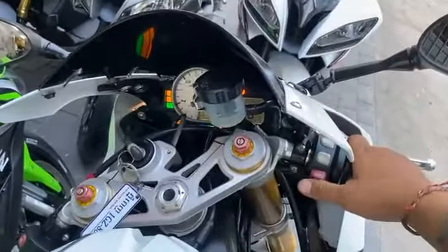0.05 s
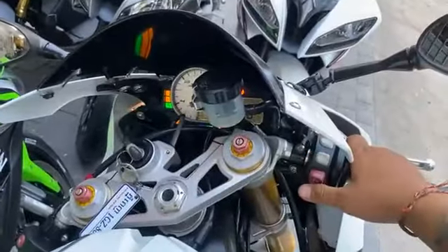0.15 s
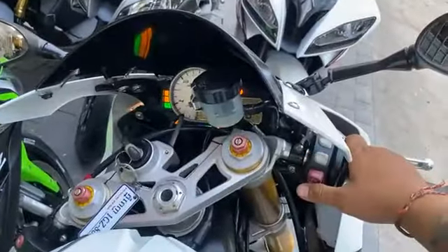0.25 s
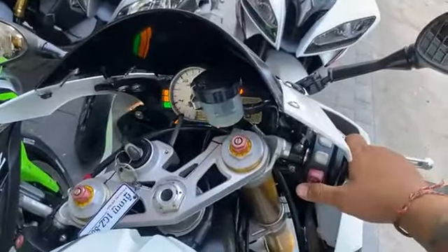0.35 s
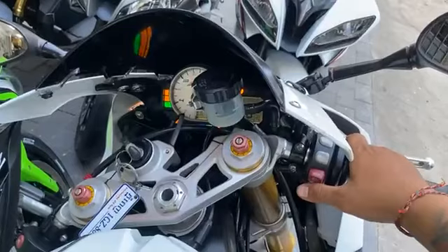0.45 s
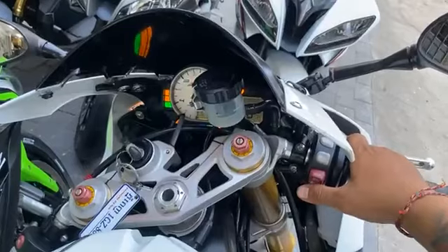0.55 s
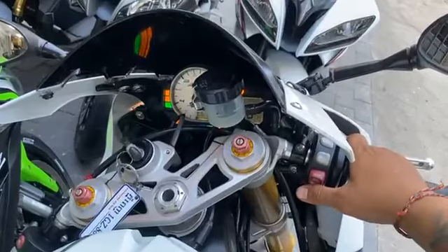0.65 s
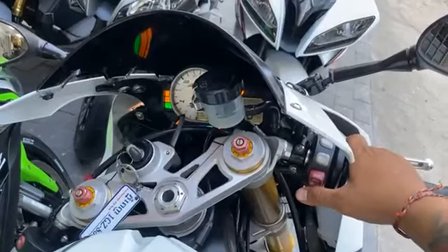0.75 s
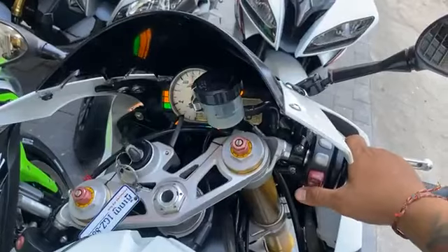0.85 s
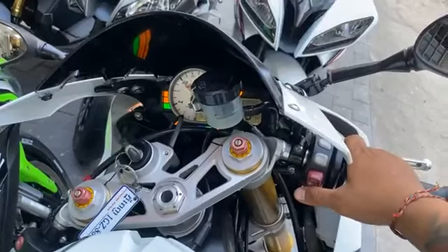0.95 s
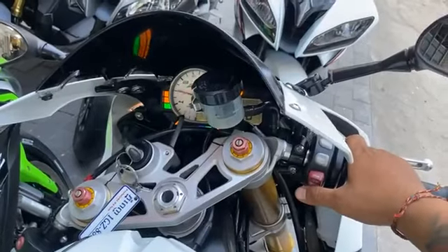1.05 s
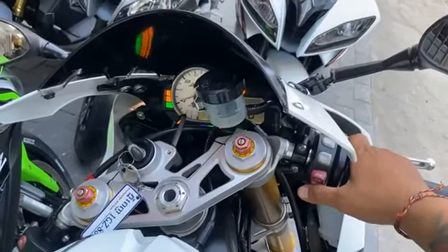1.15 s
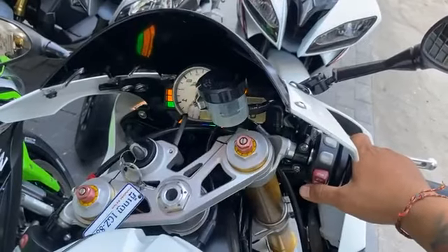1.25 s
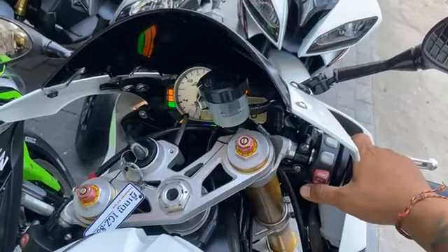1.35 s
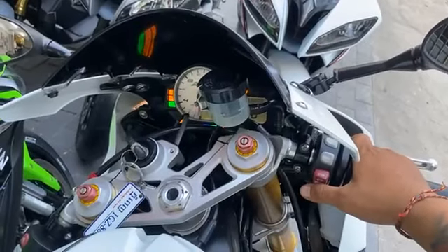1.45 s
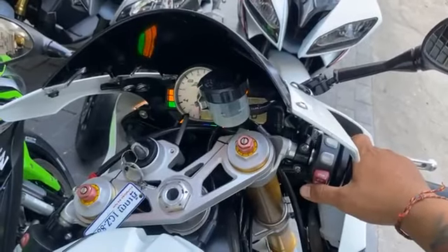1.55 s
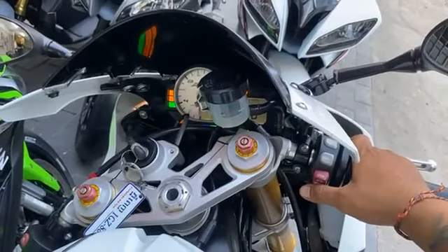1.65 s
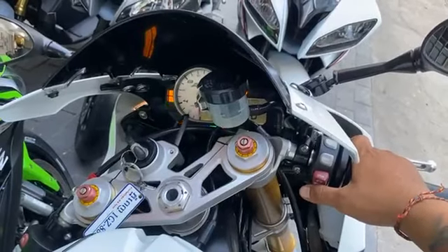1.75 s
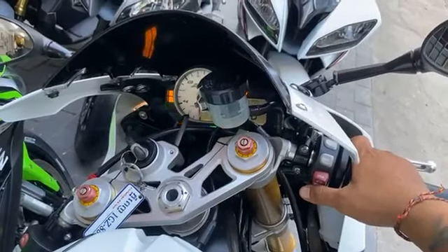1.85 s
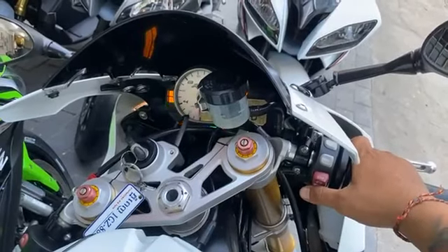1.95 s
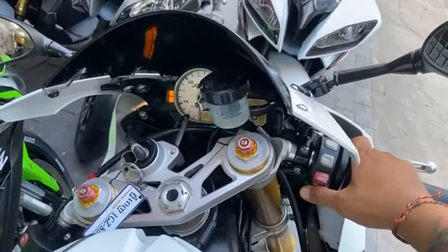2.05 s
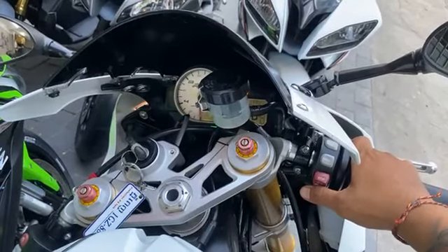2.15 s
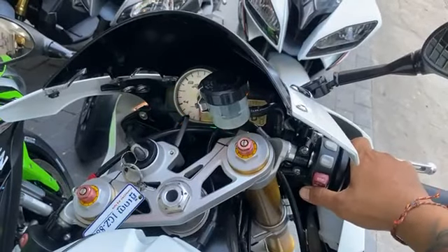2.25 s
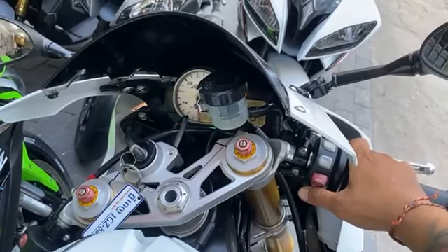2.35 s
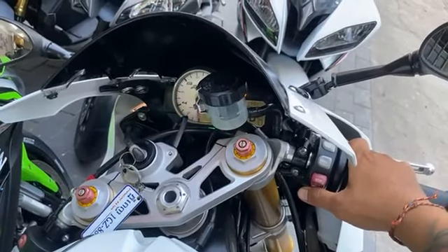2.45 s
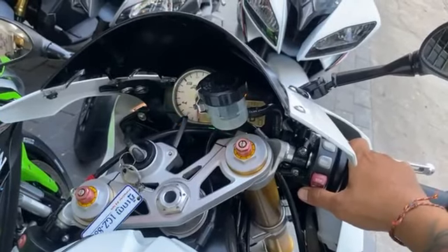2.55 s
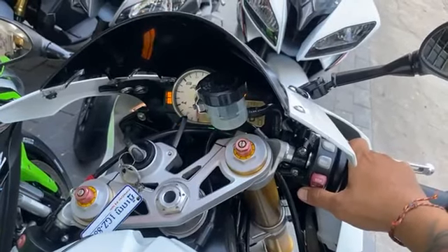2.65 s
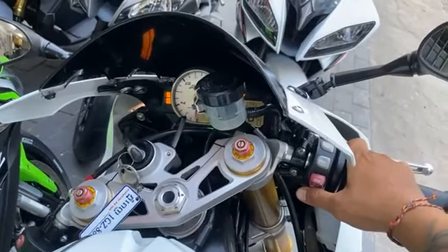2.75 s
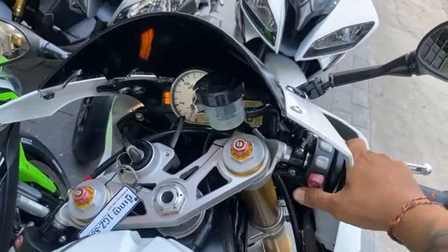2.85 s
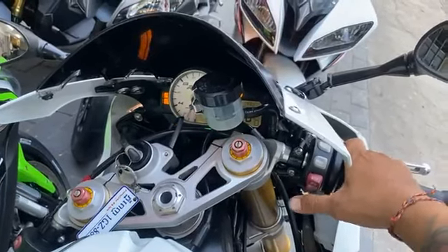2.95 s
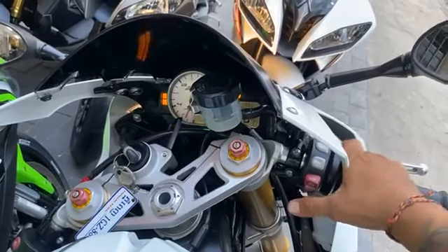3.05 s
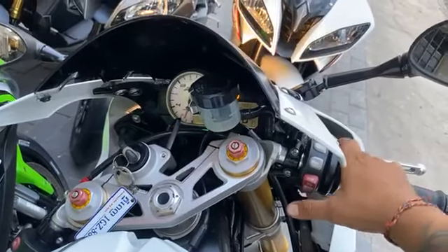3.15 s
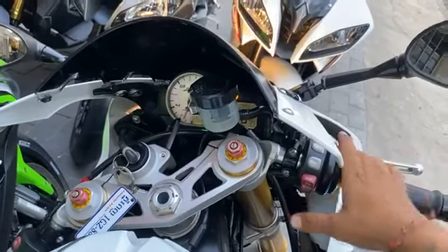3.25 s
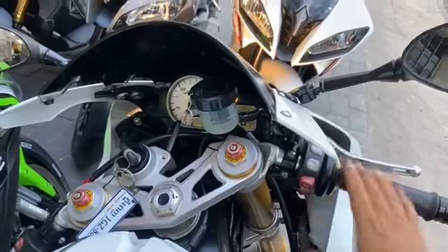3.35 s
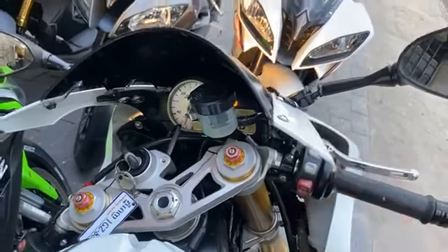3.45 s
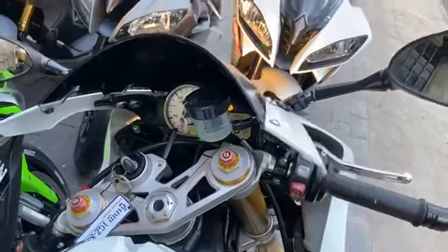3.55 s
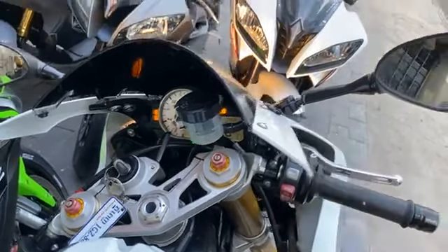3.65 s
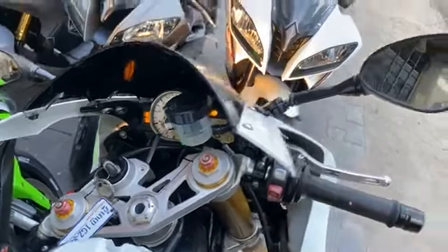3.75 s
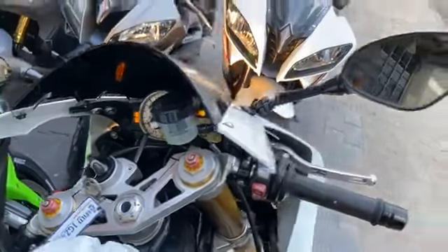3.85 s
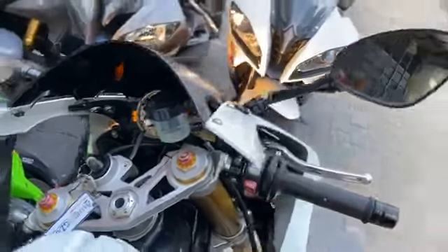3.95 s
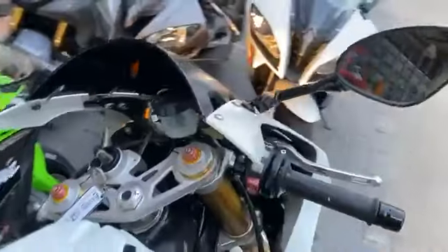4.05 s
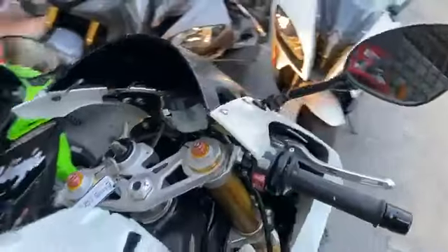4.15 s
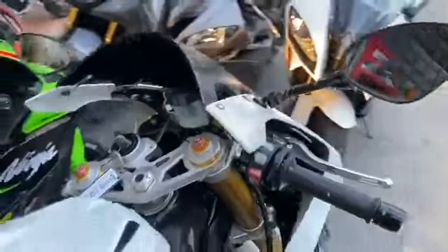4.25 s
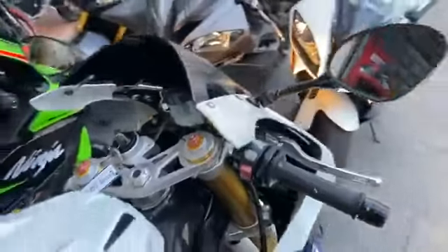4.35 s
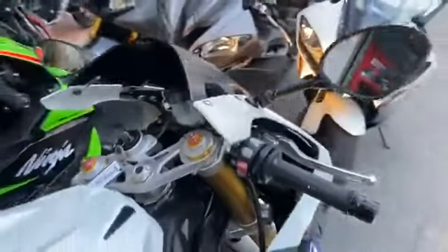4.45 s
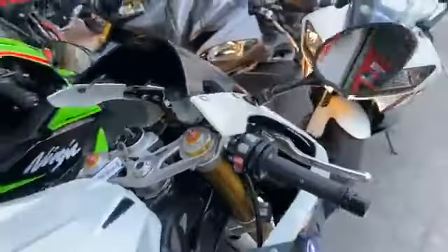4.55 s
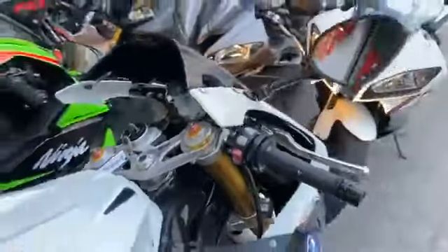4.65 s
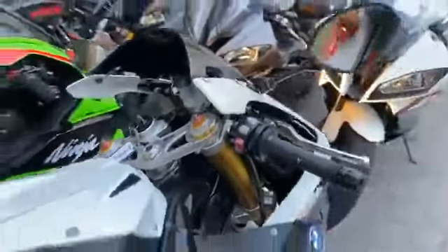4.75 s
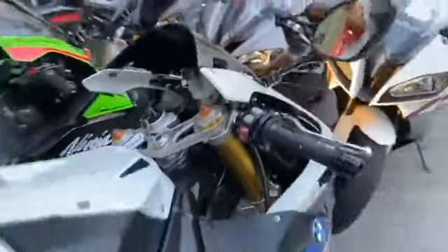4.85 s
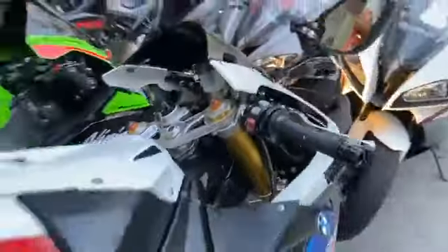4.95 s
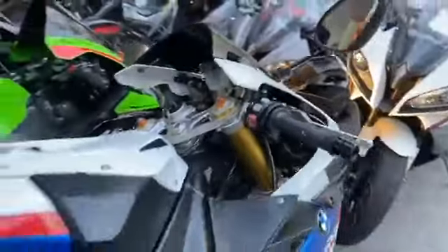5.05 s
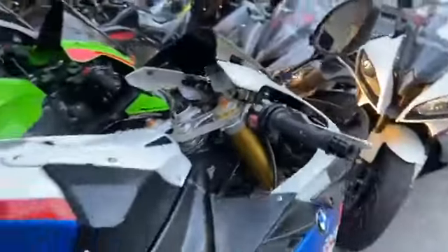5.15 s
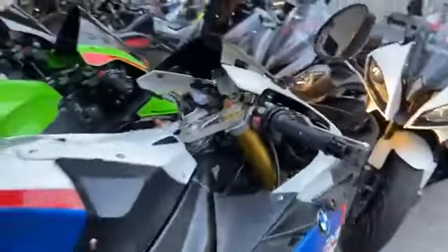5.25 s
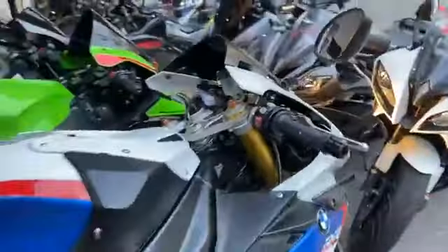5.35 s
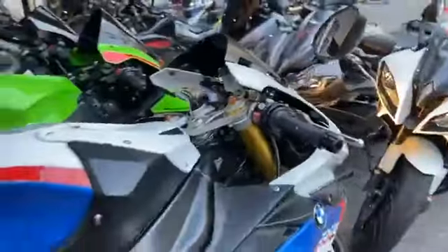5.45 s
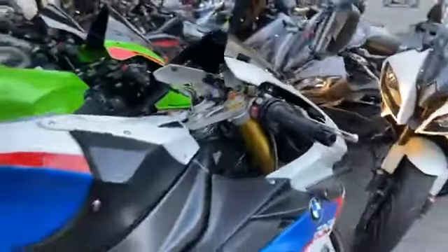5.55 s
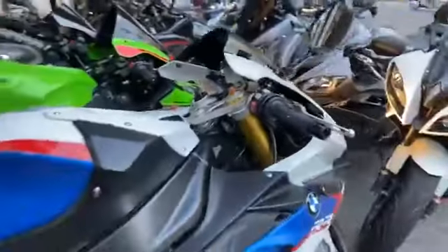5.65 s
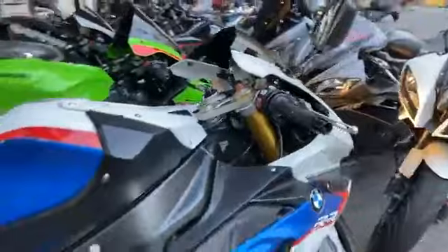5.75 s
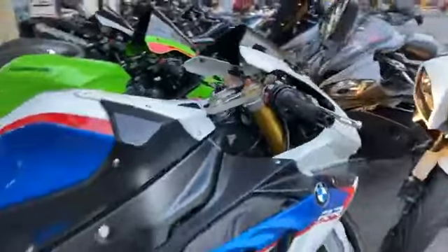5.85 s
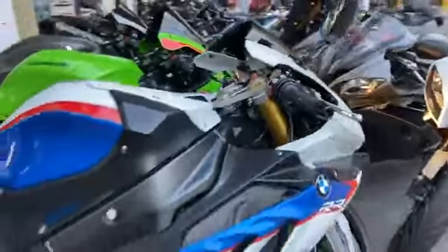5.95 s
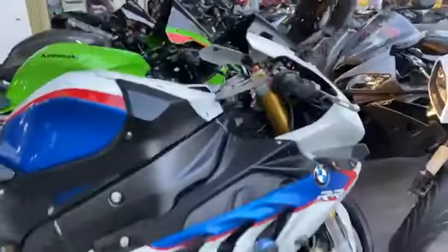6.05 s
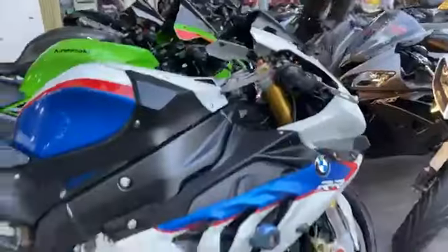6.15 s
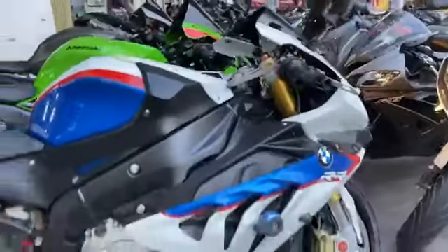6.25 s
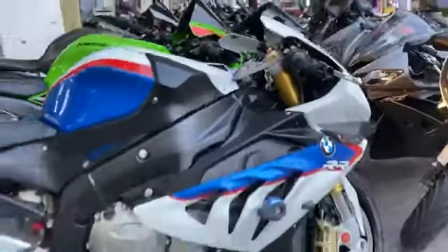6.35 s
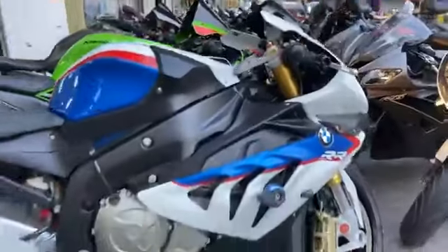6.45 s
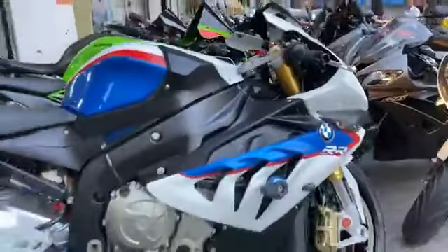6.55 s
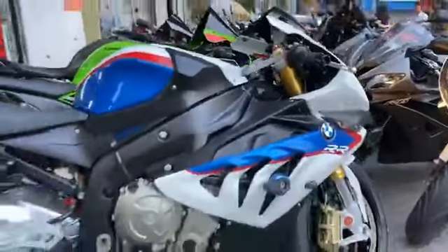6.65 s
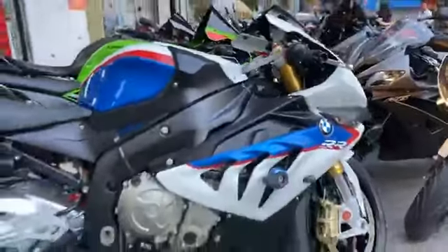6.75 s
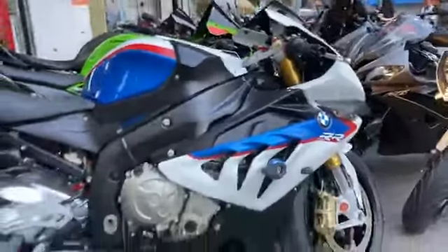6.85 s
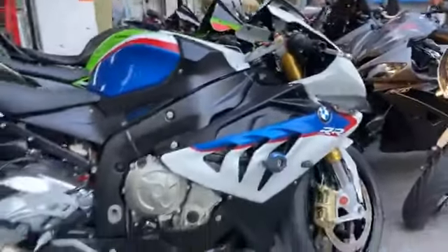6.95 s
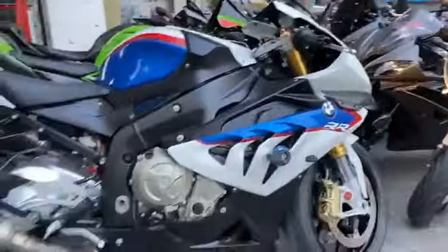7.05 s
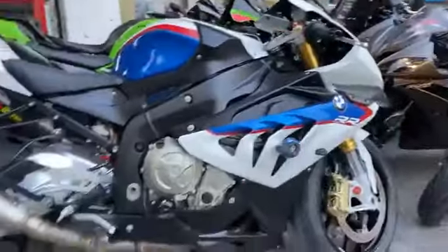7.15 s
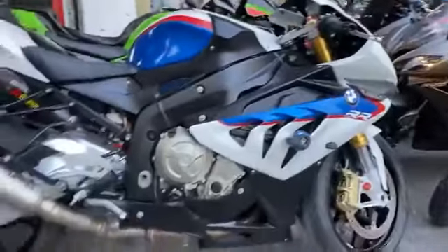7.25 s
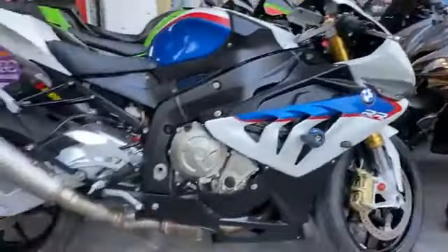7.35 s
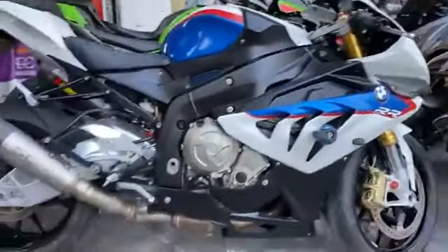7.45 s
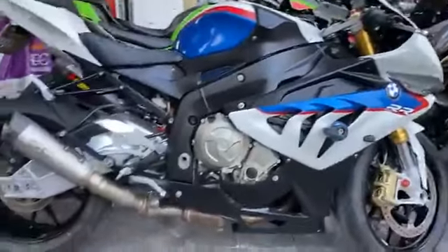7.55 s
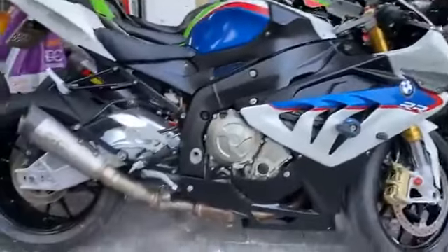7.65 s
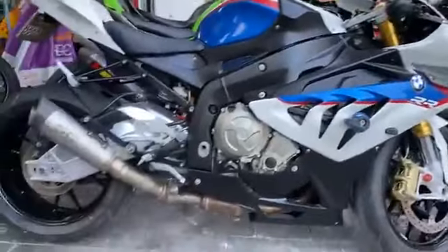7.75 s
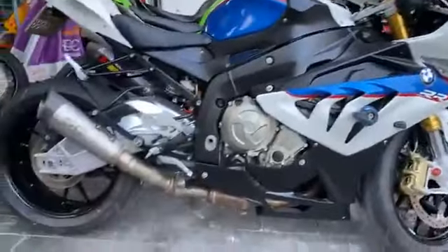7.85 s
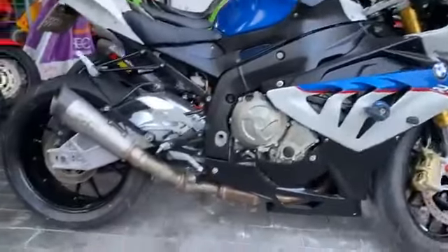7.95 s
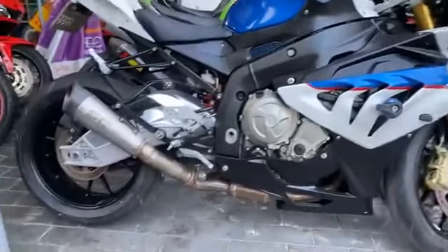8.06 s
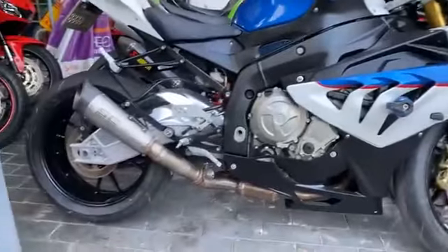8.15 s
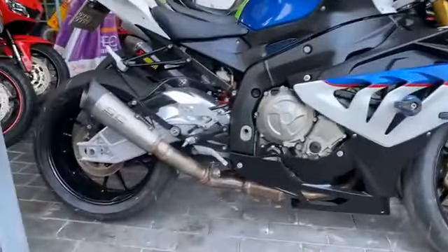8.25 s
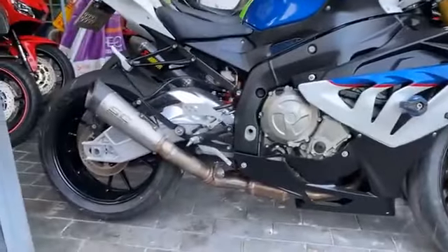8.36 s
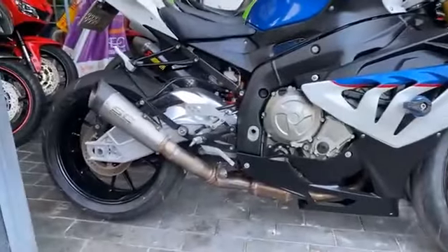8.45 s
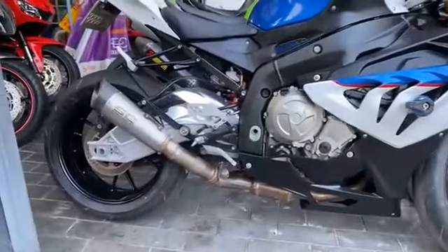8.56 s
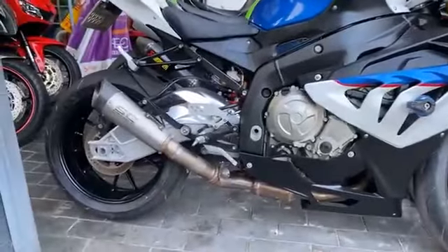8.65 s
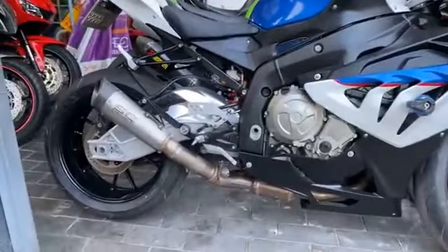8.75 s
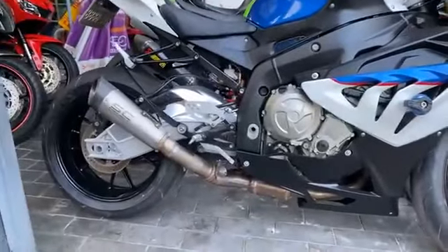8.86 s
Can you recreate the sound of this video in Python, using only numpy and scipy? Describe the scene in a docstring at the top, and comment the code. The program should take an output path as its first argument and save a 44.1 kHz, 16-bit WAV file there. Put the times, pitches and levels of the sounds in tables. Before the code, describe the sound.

After two seconds of quiet street rumble, a starter grinds through five compressions and a four-cylinder motorcycle catches, idling with a lumpy, fast-surging exhaust throb.

```python
"""Sport motorcycle starting and idling

A four-cylinder motorcycle is started among parked bikes, with traffic rumbling beyond: filtered noise.
The starter grinds through five compressions: toothed noise and sagging tones. Then the engine catches.
It idles with a lumpy surge about five times a second; each firing is a pulse that rings a short open pipe.
Valve gear rattles as noise shaped by small ticks, and faint whines come and go.
The sound colours change as the listener walks from the cockpit to the bike's side."""
import sys
import numpy as np
from scipy import signal
from scipy.fft import rfft, irfft, next_fast_len
from scipy.io import wavfile

SR = 44100
rng = np.random.default_rng(int(sys.argv[2]) if len(sys.argv) > 2 else 0)


def to_wav(sig):
    """Store sig (one row per channel, or 1-D mono) as 16-bit WAV at the path in sys.argv[1].

    Samples outside -1..1 are clipped; the rate is SR.
    """
    pcm = np.clip(np.atleast_2d(sig), -1, 1) * 32767
    pcm = np.round(pcm).astype(np.int16)
    wavfile.write(sys.argv[1], SR, pcm.T)  # frames by channels


N = 392931
TIME = np.arange(N) / SR   # s
SOLENOID_S, CATCH_S = 2.176, 2.745   # when the starter is thrown in, and when the engine catches
CLATTER_SWING_DB = 2   # how far gear load moves clatter and whines in the deepest surges

# The idle hunts: each surge has one hardest boom, then the cylinders fire weakly for a moment
# [boom t/s, boom strength/0-1, strength in the lull after it/0-1, lull length/s]
SURGES = [(2.763, 0.67, .8, .03), (2.792, 0.69, 0.15, 0.093), (3.012, .52, 0.49, 0.028),
          (3.203, 0.67, 0.19, 0.064), (3.370, 0.58, 0.41, 0.027), (3.621, 0.55, 0.23, 0.082),
          (3.793, 0.58, 0.14, 0.1), (3.961, 0.52, 0.21, 0.1), (4.132, 0.59, 0.19, 0.1),
          (4.322, 0.55, 0.1, 0.064), (4.511, 0.49, 0.29, 0.12), (4.682, 0.61, .16, 0.064),
          (4.853, 0.66, 0.33, 0.053), (5.047, 0.71, 0.58, 0.051), (5.234, 0.77, 0.17, 0.122),
          (5.408, 0.81, 0.19, 0.11), (5.578, 0.77, .12, 0.094), (5.768, 0.68, 0.14, 0.096),
          (5.960, 0.72, 0, 0.042), (6.131, 0.68, 0.49, 0.12), (6.345, 0.75, 0.12, 0.093),
          (6.541, 0.73, 0.02, 0.041), (6.734, 0.67, 0.04, 0.066), (6.929, 0.7, 0.43, 0.064),
          (7.120, 0.73, 0.39, 0.05), (7.311, 0.65, 0.12, 0.058), (7.505, 0.68, 0.39, 0.035),
          (7.699, 0.71, 0.31, 0.032), (7.89, .76, .02, 0.069), (8.064, 0.75, 0.27, .075),
          (8.254, 0.71, 0.46, 0.056), (8.448, 0.69, 0.54, 0.025), (8.641, 0.75, 0.46, 0.029),
          (8.832, 0.76, 0.09, 0.06)]
# What reaches the listener from the pipe
# [t/s, change in drone of the two lowest resonances/dB, change in bark/dB, change in rasp/dB]
FACING = [(2.8, 5, 6, 11), (3.4, 0, 4.5, 2), (3.75, 4, 6.5, 11.5), (4.0, 4, 7, 8), (4.6, 2.5, 2.5, 13.5),
          (5.2, -1.5, 2.5, -7), (6.0, 0.5, 3, -17), (7.0, -1, 2, -8), (8.0, -1.5, -1.5, -9),
          (8.9, -1.5, -7.5, -0.5)]
# Colour of the gas rushing out of the pipe [f/Hz, level per Hz/dB]
RUSH = [(150, 9.5), (250, 4.5), (330, 4), (430, -2.5), (550, 1.5), (640, -14.5), (710, -57), (800, -11),
        (1100, -32), (2500, -25)]


def from_db(db):
    """Decibels to gain."""
    return 10 ** (np.asarray(db) / 20)


def rms_one(x):
    """Scale to unit power."""
    return x / np.sqrt(np.mean(x ** 2) + 1e-20)


def in_time(rows):
    """Each column of a curve at every sample."""
    s, *columns = np.transpose(rows)
    return [np.interp(TIME, s, c) for c in columns]


def coloured(x, spectrum):
    """Give x a spectrum that falls away steeply past both ends; rms 1."""
    hz, db = np.transpose(spectrum)
    size = next_fast_len(N)
    octave = np.log2(np.maximum(np.arange(size // 2 + 1) * SR / size, 1))
    below = np.maximum(np.log2(hz[0]) - octave, 0)
    above = np.maximum(octave - np.log2(hz[-1]), 0)
    gain = from_db(np.interp(octave, np.log2(hz), db) - 105 * (below + above))
    return rms_one(irfft(rfft(x, size) * gain, size)[:N])


def cut(x, hz, kind, order=2):
    """Butterworth low-pass or high-pass."""
    sos = signal.butter(order, min(hz, .45 * SR), kind, fs=SR, output="sos")
    return signal.sosfilt(sos, x + 1e-18)


def resonate(x, hz, width_hz):
    """One resonance with gain 1 on top."""
    r = np.exp(-np.pi * width_hz / SR)
    top = np.array([1, 0, -1]) * (1 - r * r) / 2
    return signal.lfilter(top, [1, -2 * r * np.cos(2 * np.pi * hz / SR), r * r], x + 1e-18)


def body(x, modes):
    """Resonances in parallel, with alternating signs."""
    return sum((-1) ** k * from_db(db) * resonate(x, hz, width) for k, (hz, width, db) in enumerate(modes))


def clicks(at, sizes):
    """Single impulses at the given samples."""
    return np.bincount(np.clip(at, 0, N - 1).astype(int), sizes, N)


def linger(x, decay_s):
    """Every impulse becomes an exponential fade of the same height."""
    return signal.lfilter([1], [1, -np.exp(-1 / (decay_s * SR))], x + 1e-18)


def swell(start, rise_s, decay_s):
    """A straight rise to 1, then an exponential fade."""
    age = TIME - start
    return np.clip(age / rise_s, 0, 1) * np.exp(-np.maximum(age - rise_s, 0) / decay_s)


def noise():
    """White noise."""
    return rng.standard_normal(N)


def narrow(hz, width_hz):
    """A wavering tone: noise twice through one resonance; rms 1."""
    return rms_one(resonate(resonate(noise(), hz, width_hz), hz, width_hz))


def sine(hz):
    """A sine whose frequency may change from sample to sample."""
    return np.sin(2 * np.pi * np.cumsum(hz) / SR)


def street(traffic_db=4, hiss_db=-50):
    """Traffic rumble and a far hiss are coloured noise; small knocks and squeaks are bands of noise."""
    # rumble over time [t/s, level before traffic_db is added/dB]
    rumble_curve = [(0.0, -33.5), (0.32, -34), (0.37, -35.5), (0.47, -32.5), (0.55, -36), (0.93, -34.5),
                    (0.99, -38), (1.53, -35.5), (2.13, -37), (2.15, -37)]
    # colours of the rumble and of the steady hiss [f/Hz, level per Hz/dB]
    rumble_colour = [(18, -62), (30, -28), (55, -14), (75, 1.5), (89, -7.5), (108, -7.5), (146, -10.5),
                     (171, -19), (286, -25.5), (346, -32), (455, -30.5), (491, -29.5), (600, -26.5),
                     (780, -52), (1320, -120)]
    hiss_colour = [(380, -30), (650, -5), (955, -1), (1050, -7), (1280, -3.5), (1380, -3), (2030, -10.5),
                   (2260, -17), (2950, -11), (4700, -17.5), (6370, -14), (7670, -20.5), (9610, -20),
                   (13800, -34), (15500, -36)]
    # small noises in the shop [t/s, level/dB, f/Hz, width/Hz, rise/s, decay/s]
    knocks = [(.29, -40, 400, 160, 0.021, 0.017), (.595, -49, 6460, 7000, 0.0031, 0.014),
              (.85, -43, 700, 800, 0.0088, .025), (1.04, -54, 4900, 80, 0.025, .06),
              (1.05, -63, 9750, 200, 0.027, .05), (1.12, -56, 4820, 80, .02, .03),
              (1.45, -41.5, 420, 400, .02, 0.03)]
    rumble_db, = in_time(rumble_curve)
    out = from_db(rumble_db + traffic_db) * coloured(noise(), rumble_colour)
    out = out + from_db(hiss_db) * coloured(noise(), hiss_colour)
    for s, db, hz, width_hz, rise, decay in knocks:
        out = out + from_db(db) * swell(s, rise, decay) * narrow(hz, width_hz)
    return out


def starter(spin_db=-42, solenoid_db=-40, teeth_db=2, grind_db=0.5, whine_hz=1950, whine_db=-4,
            whine_sag_s=.1, whine_late_s=0.024, whine_decay_s=0.013, growl_db=-3.0, overtone_db=-5,
            flutter=0.0094):
    """The motor spins up; each compression makes the gears growl and grind, and drags their whine down."""
    # compressions that load the starter [t/s, push level/dB, rise/s, decay/s, growl f/Hz]
    strokes = [(2.236, -26, 0.056, 0.032, 1010), (2.402, -24.5, 0.011, 0.018, 1130),
               (2.492, -23.5, 0.0067, 0.02, 1140), (2.584, -24, 0.0062, 0.022, 1130),
               (2.671, -25, 0.0098, 0.026, 1140)]
    # colour of the grinding [f/Hz, level per Hz/dB]
    grind_colour = [(350, -9), (600, -10), (766, -12.5), (1010, -0.5), (1340, -4), (1860, 0), (2610, -10),
                    (3110, -6.5), (4200, -10), (4880, -15), (5980, -8.5), (7540, -18.5), (9240, -15.5),
                    (13000, -30.5), (15500, -44)]
    engaged = swell(SOLENOID_S, 0.0012, np.inf)
    running = engaged * np.clip((CATCH_S + 0.017 - TIME) / 0.014, 0, 1)
    load = from_db(solenoid_db) * swell(SOLENOID_S, 0.0016, 0.3)
    waver = 1 + flutter * rms_one(cut(noise(), 130, "low"))
    spin_up_hz = np.interp(TIME, [SOLENOID_S, strokes[0][0]], [1130, 1760])
    tones = from_db(-25.5) * swell(2.205, 0.02, 0.0081) * sine(spin_up_hz * waver)
    for s, db, rise, decay, growl_hz in strokes:
        push = from_db(db) * swell(s, rise, decay)
        load = load + push
        # four harmonics, each weaker than the one below
        growl = sum(from_db(growl_db + overtone_db * k) * sine((k + 1) * growl_hz * waver) for k in range(4))
        tones = tones + push * growl
        sagging_hz = whine_hz * np.exp(-np.maximum(TIME - s - 1.4 * rise, 0) / whine_sag_s)
        whine_level = from_db(db + whine_db) * swell(s, rise + whine_late_s, whine_decay_s)
        tones = tones + whine_level * sine(sagging_hz * waver)
    roughness = np.tanh(rms_one(cut(noise(), 560, "low")))
    teeth = rms_one(from_db(teeth_db * roughness))
    grind = from_db(grind_db) * coloured(noise() * teeth, grind_colour) * np.hypot(load, from_db(spin_db))
    return (grind + tones * np.sqrt(teeth)) * running


def surge_depth(top, lull):
    """How far a surge swings the engine: 1 if firing stops in the lull, 0 if it carries on unchanged."""
    return np.sqrt(np.clip(1 - lull / top, 0, 1))


def firings(idle_firings_per_s=47.2, valve_lead_s=.0105, speed_swing=0.1393, speed_lag=0.0458,
            fade_s=0.006, pick_up_strength=0.33, pick_up_s=.035, full_at=0.81):
    """One firing per half turn of the crank, which slows in each lull and races into the next boom.

    Gives the samples at which an exhaust valve opens, and how hard each cylinder has fired.
    speed_swing is the crank's share of speed change in the deepest surges.
    speed_lag (top speed) and full_at (full strength) are shares of a surge after its boom."""
    last = SURGES[-1]
    following = SURGES[1:] + [(last[0] + last[0] - SURGES[-2][0], *last[1:])]
    times, strengths = [], []
    for (s, top, lull, lull_s), (next_s, next_top, _, _) in zip(SURGES, following):
        length = next_s - s
        count = max(round(length * idle_firings_per_s), 1)
        phase = (np.arange(count) + .5) / count - speed_lag
        speed = 1 + speed_swing * surge_depth(top, lull) * np.cos(2 * np.pi * phase)
        age = length * (np.cumsum(1 / speed) - 1 / speed) / np.sum(1 / speed)
        # fade into the lull, then pick up at a middling strength and climb to full
        weak = lull + (top - lull) * np.exp(-age / fade_s)
        climb = np.clip((age - lull_s) / max(full_at * length - lull_s, 1e-3), 0, 1)
        strong = (1 - climb) * max(pick_up_strength, lull) + climb * next_top
        picked_up = np.clip((age - lull_s) / pick_up_s + .5, 0, 1)
        # the valve opens a little before its boom peaks
        times.extend(s - valve_lead_s + age)
        strengths.extend((1 - picked_up) * weak + picked_up * strong)
    at = np.array(times) * SR
    return at[at < N].astype(int), np.array(strengths)[at < N]


def pipe_boom(at, strength, drone_db, opening_hz, scatter_db=0.7):
    """Each firing kicks the low resonances of the exhaust pipe."""
    # resonances; soft firings hardly wake the top one
    # [f/Hz, width/Hz, level at full strength before drone changes/dB, power of strength]
    pipe = [(50.5, 13.6, 40, 1.2), (100.6, 24.5, 38.5, 1.04), (159.8, 17.9, 45.5, 1.016),
            (246.8, 17.4, 44.5, 1.49)]
    boom = 0
    for k, (hz, width, db, power) in enumerate(pipe):
        sizes = strength ** power * from_db(scatter_db * rng.standard_normal(len(at)))
        # the valve takes a moment to open, which rounds every pulse
        kicks = cut(clicks(at, sizes), opening_hz, "low", order=4)
        drone_share = .5 * (k == 0) + (k == 1)
        boom = boom + (-1) ** k * from_db(db + drone_db * drone_share) * resonate(kicks, hz, width)
    return boom


def pipe_bark(at, strength, puffs, bark_db, rasp_db, opening_hz, hardness=3.5, tear_db=-50.5):
    """Hard firings wake higher pipe resonances, and the hardest puffs tear at its mouth."""
    # first three bark, the rest rasp [f/Hz, width/Hz, level before bark or rasp changes/dB]
    bark_modes = [(276, 60, 25.5), (420, 43, 1), (513, 6, 26), (660, 11, -30), (794, 65, -8.5),
                  (787, 40, 11.5)]
    sharp = cut(clicks(at, strength ** hardness), opening_hz, "low", order=4)
    bark = from_db(bark_db) * body(sharp, bark_modes[:3])
    rasp = from_db(rasp_db) * body(sharp, bark_modes[3:])
    tear_colour = [(560, -2), (630, 13.5), (710, -1), (800, 7.5), (950, -27.0)]   # f/Hz, level per Hz/dB
    tear = from_db(tear_db + rasp_db) * coloured(noise() * puffs ** 2, tear_colour)
    return bark + rasp + tear


def piston_hum(at, strength, pumping=0.13, lag_s=0.01168, hum_db=43, hum_hz=172, width_hz=18):
    """Fired or not, the rising piston then pushes the gas out and keeps the pipe humming."""
    soft = cut(clicks(at + lag_s * SR, pumping * (1 + strength)), 440, "low")
    return from_db(hum_db) * resonate(soft, hum_hz, width_hz)


def gas_rush(at, strength, puffs, bark_db, rush_db=-39, turbulence_db=1):
    """Gas leaves as one clean pulse per firing, with turbulent noise around it."""
    pulses = coloured(clicks(at, strength ** 3.0), RUSH)
    turbulence = coloured(noise() * (puffs ** 1.17 + 0.015), RUSH)
    return from_db(rush_db + bark_db) * (pulses + from_db(turbulence_db) * turbulence)


def pipe_burble(puffs, drone_db, burble_db=-32):
    """Turbulence in the pipe is low noise that makes no two beats alike."""
    colour = [(30, -29), (45, -39), (80, -45), (125, -12), (185, -2.5), (230, -5.5), (300, -14)]
    return from_db(burble_db + drone_db / 2) * coloured(noise() * (puffs + 0.27), colour)


def exhaust(at, burn, jitter_s=0.0002, opening_hz=1100, rush_decay_s=0.03):
    """Each firing kicks the pipe; hard ones also make it bark and blow a puff of rushing gas."""
    # lone hard firings that break into a lull [t/s, strength/0-1]
    lone = [(2.826, 0.67), (2.89, 0.65), (3.875, 0.4), (4.085, 0.46), (4.243, 0.34), (4.598, 0.53),
            (5.324, 0.59), (5.492, 0.54), (5.636, .5), (6.428, 0.48), (6.596, 0.42), (6.772, 0.68),
            (7.4, .55)]
    at = np.clip(at + jitter_s * SR * rng.standard_normal(len(at)), 0, N - 1).astype(int)
    strength = np.abs(burn)
    for s, hard in lone:
        strength[np.argmin(np.abs(at - s * SR))] = hard
    drone_db, bark_db, rasp_db = in_time(FACING)
    puffs = cut(linger(clicks(at, strength), rush_decay_s), 140, "low")
    boom = pipe_boom(at, strength, drone_db, opening_hz)
    hum = piston_hum(at, strength)
    bark = pipe_bark(at, strength, puffs, bark_db, rasp_db, opening_hz)
    gas = gas_rush(at, strength, puffs, bark_db) + pipe_burble(puffs, drone_db)
    return boom + hum + bark + gas * swell(CATCH_S, 0.004, np.inf)


def gear_load(clatter_at=0.79):
    """Load on the gears, -1 to 1: slack while the crank coasts, taut as it is driven up again.

    It is greatest at the share clatter_at of each surge."""
    s, top, lull, _ = np.transpose(SURGES[1:])
    turn = np.interp(TIME, np.append(s, 2 * s[-1] - s[-2]), np.arange(len(s) + 1))
    depth = np.interp(turn, np.arange(len(s)) + clatter_at, surge_depth(top, lull))
    return depth * np.cos(2 * np.pi * (turn - clatter_at))


def valve_gear(at, case_rattle_db=4, tick_db=2, tick_scatter_db=2, tick_decay_s=0.012, ring_db=-7,
               split_hz=3500, sizzle_swing_db=2):
    """Valves seat twice per firing, over a steady sizzle of chain and gears; one cylinder ticks loudest."""
    # valve gear, chain and clutch, loudest just after the start
    # [t/s, clatter level before gear load/dB, sizzle level before gear load/dB]
    gear_levels = [(2.76, -32.5, -38.5), (3.1, -36, -40), (3.23, -31.5, -35), (3.44, -30.5, -36),
                   (3.65, -35.5, -40), (3.87, -39.5, -46), (4.3, -39, -46), (5.3, -41.5, -42.5),
                   (5.95, -43, -43.5), (6.7, -45, -45.5), (7.5, -46.5, -47.5), (8.9, -46.5, -49.5)]
    # their colour above the tank and beside the engine [f/Hz, level per Hz/dB]
    colour_above = [(410, 1), (700, -4), (757, -10), (1050, -4), (1630, -2.5), (2250, -11), (2870, -8),
                    (3320, -5), (3820, -12), (6260, -0.5), (7600, -10.5), (9720, -9), (10500, -18),
                    (13300, -17), (15500, -50)]
    colour_beside = [(410, -33), (700, -63), (818, -2), (993, -15), (1130, -4), (1800, -5.5), (1970, -3.5),
                     (2400, -17.5), (2730, -7.5), (3870, -15.5), (5940, -9), (7400, -19), (9230, -15.5),
                     (13300, -29.5), (15500, -31)]
    # ringing of the engine cases, relative to each other [f/Hz, width/Hz, level/dB]
    cases = [(1070, 64, -13), (1550, 240, 10), (1895, 175, 9.5), (2730, 320, 0.5), (3057, 360, 8.5),
             (4420, 37, 11), (6240, 1400, 4)]
    count = 2 * len(at)
    seats = np.interp(np.arange(count) / 2 + .15, np.arange(len(at)), at)
    seats = seats + rng.normal(0, 0.00078 * SR, count)
    pattern_db = np.resize([1, -29, -2, -10.5, -2.5, -38, -2.5, -36], count)
    sizes = from_db(tick_db + pattern_db + tick_scatter_db * rng.standard_normal(count))
    rattle = noise() * np.sqrt(1 + linger(clicks(seats, sizes), tick_decay_s) ** 2)
    walked = np.clip((TIME - 4.0) / 2.0, 0, 1)   # 0 above the tank, 1 beside the engine
    metal = (1 - walked) * coloured(rattle, colour_above) + walked * coloured(rattle, colour_beside)
    unsteady = from_db(case_rattle_db * np.tanh(rms_one(cut(noise(), 15.5, "low"))))
    ringing = rms_one(body(np.abs(rattle) * noise() * unsteady, cases))
    metal = metal + from_db(ring_db) * ringing
    clatter_db, sizzle_db = in_time(gear_levels)
    load = gear_load()
    low, high = (rms_one(cut(metal, split_hz, kind, order=4)) for kind in ("low", "high"))
    clatter = from_db(clatter_db + CLATTER_SWING_DB * load) * low
    sizzle = from_db(sizzle_db + sizzle_swing_db * load) * high
    return (clatter + sizzle) * swell(CATCH_S, 0.021, np.inf)


def whines():
    """Faint whines of the running engine: narrow noise that fades in and out and follows the gear load."""
    # [f/Hz, width/Hz, level before gear load/dB, centre of the fade t/s, spread of the fade/s]
    whine_rows = [(4390, 260, -49.5, 4.5, 1.2), (2840, 610, -50, 7.06, 1.1), (1083, 20, -40, 2.3, 0.69),
                  (1770, 120, -43, 3.38, 0.3), (436, 30, -41, 8.7, 0.67)]
    out = 0
    for hz, width, db, s, span in whine_rows:
        out = out + from_db(db) * np.exp(-((TIME - s) / span) ** 2) * narrow(hz, width)
    return out * swell(CATCH_S, 0.076, np.inf) * from_db(CLATTER_SWING_DB * gear_load())


def walk_round(x):
    """Echoes from ground and bikes lift or hollow two bands of the exhaust as the listener walks round."""
    # the two bands [f/Hz, width/Hz]
    echo_bands = [(335, 130), (445, 80)]
    # how they change [t/s, lower band lift/dB, upper band lift/dB]
    echo_lift = [(2.8, 1, -6), (3.9, 3, -1.5), (4.5, 8.5, -8), (5.3, 4.5, -10), (5.9, 7, -1),
                 (6.502, -0.5, 6.5), (7.3, -5.5, 8.5), (8.1, -7, 10), (8.9, -5, 11.5)]
    for (hz, width_hz), lift_db in zip(echo_bands, in_time(echo_lift)):
        x = x + (from_db(lift_db) - 1) * resonate(x, hz, width_hz)
    return x


def shop_front(x, wet_db=-21, t60_s=0.034):
    """Scattered echoes from the walls and the other bikes: a short fading tail of noise."""
    age = TIME[:SR // 2]
    tail = rng.standard_normal(len(age)) * from_db(-60 * age / t60_s) * (age > .008)
    return x + from_db(wet_db) * signal.fftconvolve(x, tail / np.linalg.norm(tail))[:N]


def scene():
    """The motorcycle in front of the shop, over the street."""
    at, burn = firings()
    bike = walk_round(exhaust(at, burn)) + valve_gear(at) + whines() + starter()
    return (shop_front(bike) + street())[None]


def record(dry):
    """The microphone drops the deepest bass and the top; the sound fades in and out within 4 ms."""
    fade = np.clip(np.minimum(TIME, TIME[::-1]) * 250, 0, 1)
    thinned = cut(dry, 22.5, "high", order=4) * fade
    top_cut = signal.ellip(10, .2, 80, 15700, fs=SR, output="sos")   # steep low-pass at 15700 Hz
    return signal.sosfilt(top_cut, thinned)


dry = scene()
out = record(dry)
to_wav(out)
```